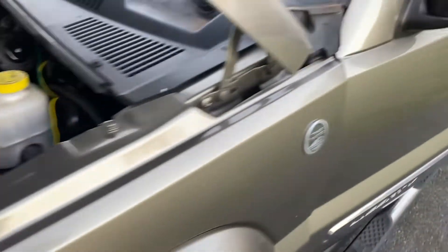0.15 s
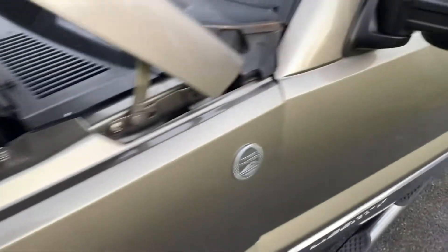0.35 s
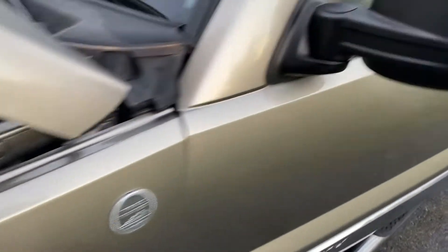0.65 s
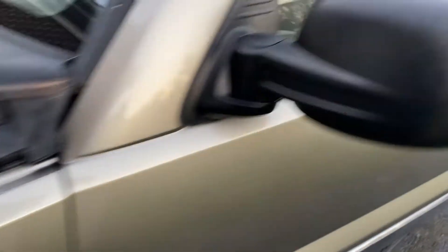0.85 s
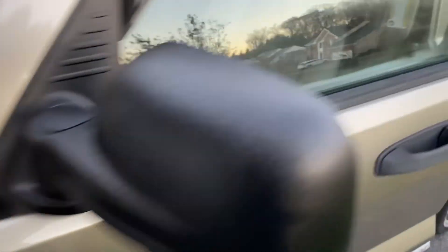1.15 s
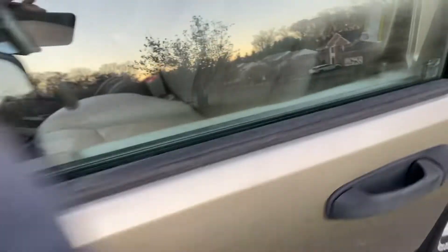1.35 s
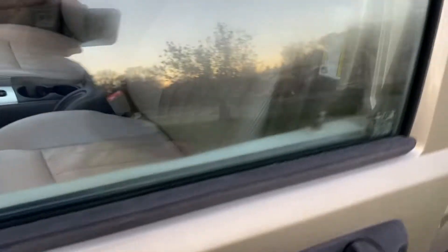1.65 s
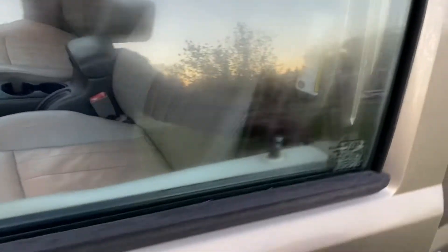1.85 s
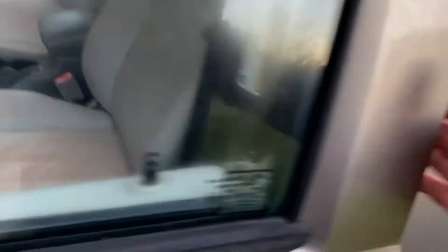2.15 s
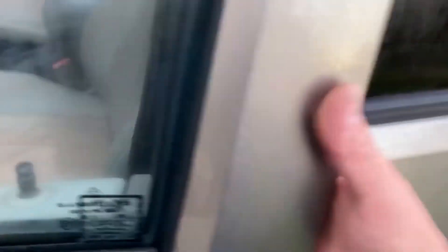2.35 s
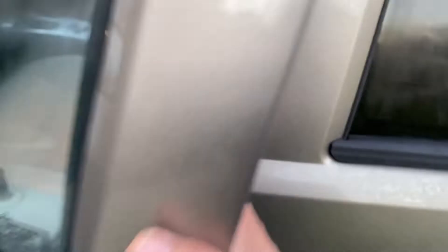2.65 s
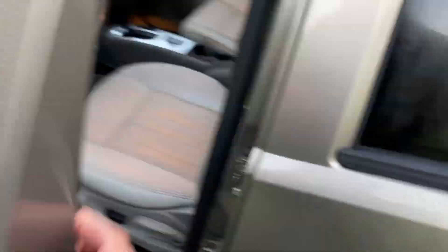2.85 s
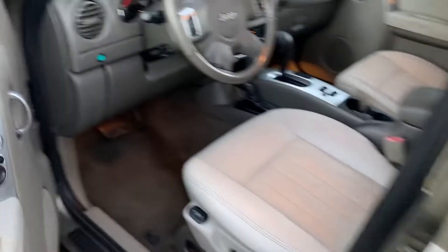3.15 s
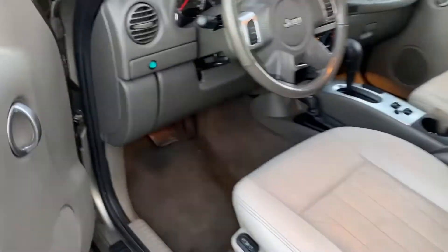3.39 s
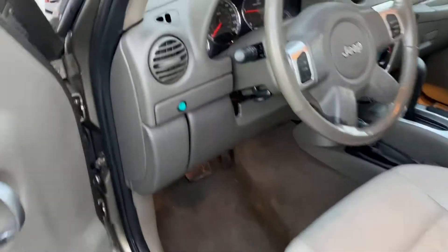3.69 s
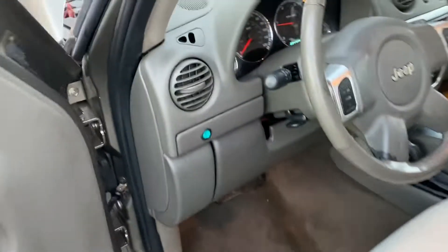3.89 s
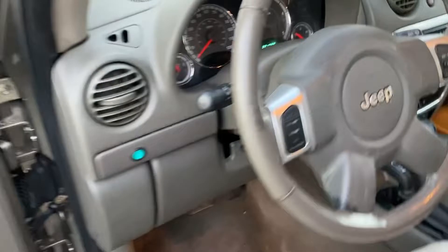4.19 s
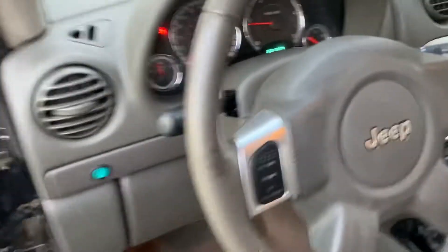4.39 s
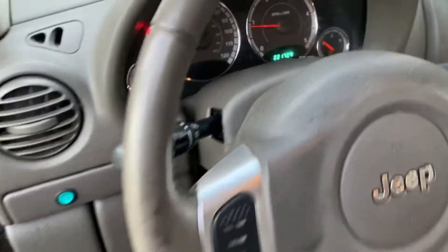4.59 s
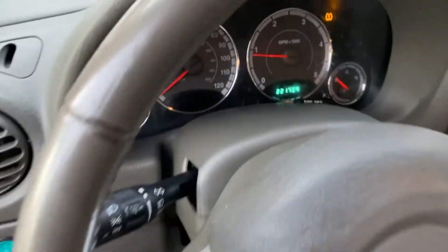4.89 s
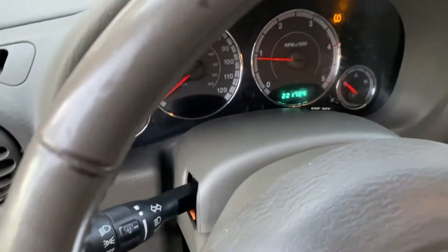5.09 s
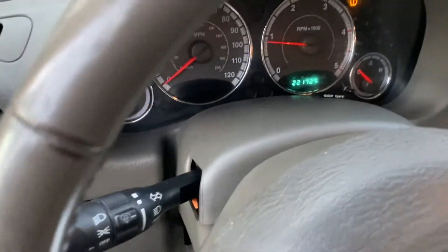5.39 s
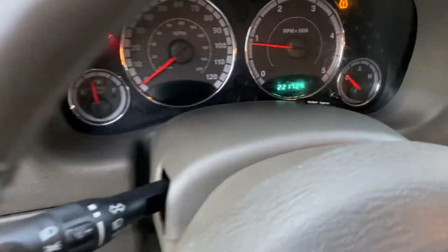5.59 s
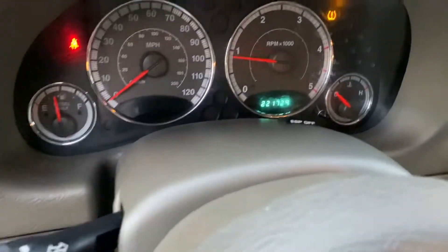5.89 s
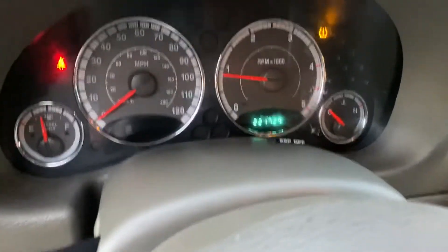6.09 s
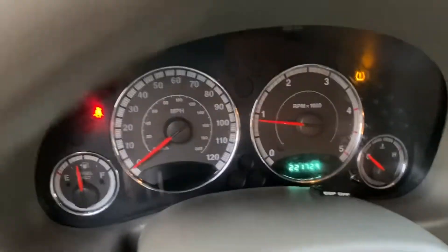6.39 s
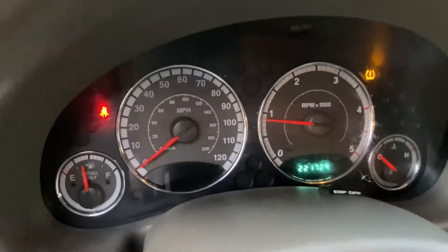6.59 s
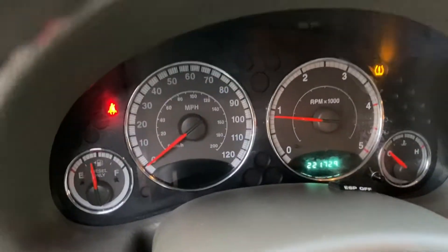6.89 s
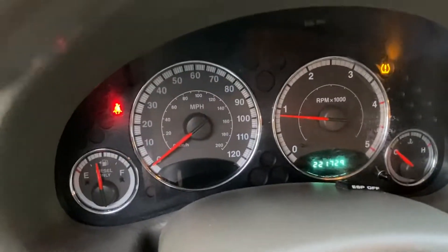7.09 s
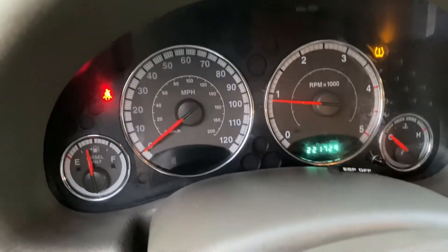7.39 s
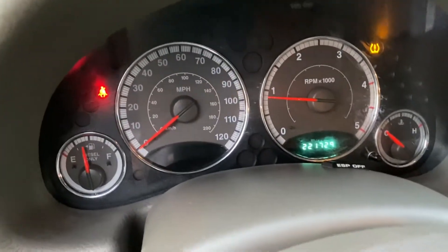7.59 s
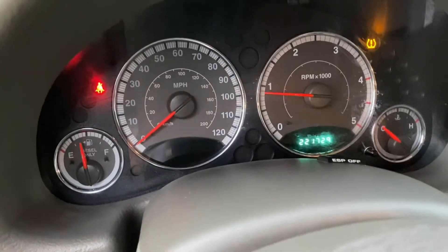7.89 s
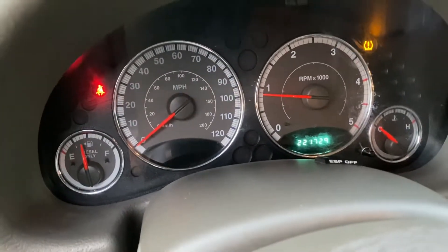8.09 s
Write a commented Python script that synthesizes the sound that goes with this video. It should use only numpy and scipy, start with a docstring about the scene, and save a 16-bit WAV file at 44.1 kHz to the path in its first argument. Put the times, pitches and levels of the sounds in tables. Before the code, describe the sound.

Steady rattly turbodiesel idle outdoors, bright metallic ticking at first, then boomy beside the door, fading to a dull, hollow murmur in the car.

```python
"""Cold diesel idle, from bonnet to driver's seat

A cold four-cylinder turbodiesel idles outdoors, heard on a walk from the open bonnet into the cabin.
Boom: sines at multiples of the firing rate. Thrum, rattle: filtered impulses at fixed crank angles.
Clatter, a hard-knocking cylinder, injectors, pipes and taps: grains gated by firing, through resonances.
Single knocks and ticks, pipe pings and a faint air hiss are added; most layers grow fainter inside."""
import sys
import numpy as np
from scipy import signal
from scipy.fft import rfft, irfft, next_fast_len
from scipy.io import wavfile

SR = 44100
rng = np.random.default_rng(int(sys.argv[2]) if len(sys.argv) > 2 else 0)


def bounce(signal):
    """Save signal as a 16-bit WAV file at the path given by the first command-line argument."""
    frames = np.transpose(np.atleast_2d(signal))
    limited = np.clip(frames, -1, 1)
    pcm = np.round(limited * 32767).astype(np.int16)
    wavfile.write(sys.argv[1], SR, pcm)


N = 363825
TIME = np.arange(N) / SR
SIZE = next_fast_len(N + SR // 4)
HZ = np.maximum(np.arange(SIZE // 2 + 1) * SR / SIZE, 1)
SIDES = np.array([[1], [-1]])   # left, right
CYLINDERS = 4   # firings per engine cycle

DOOR_OPEN_S, SILL_S = 3.02, 4.66   # middle of the door's swing, crossing the sill
# cabin resonances: (centre [Hz], width [Hz], lift [dB])
CABIN_MODES = [(650, 30, 4), (1330, 54, -4), (1416, 28, 11.5), (1610, 35, 2.5), (1710, 90, -4),
               (1820, 40, 4.5), (1980, 110, -2.5), (2490, 76, 4.5), (3000, 84, 4)]


def from_db(db):
    """Decibels to gain."""
    return 10 ** (np.asarray(db) / 20)


def rms_one(x):
    """Scale to unit rms."""
    return x / np.sqrt(np.mean(x ** 2) + 1e-20)


def in_time(rows):
    """Each column of a curve at every sample; end values hold."""
    s, *columns = np.transpose(rows)
    return [np.interp(TIME, s, column) for column in columns]


def over_hz(points):
    """A table over frequency, joined on a log axis."""
    hz, value = np.transpose(points)
    return np.interp(np.log(HZ), np.log(hz), value)


def ramp(start_s, end_s):
    """Linear passage from 0 to 1."""
    return np.clip((TIME - start_s) / (end_s - start_s), 0, 1)


def passing(s, half_s):
    """Gaussian rise to 1 and back around one moment."""
    return np.exp(-((TIME - s) / half_s) ** 2)


def drift(rate_hz):
    """Slow random curve: normal values at rate_hz, joined by lines."""
    return np.interp(TIME * rate_hz, np.arange(2000), rng.standard_normal(2000))


def band(x, hz, width_hz):
    """One resonance, gain 1 at its top."""
    return signal.lfilter(*signal.iirpeak(hz, hz / width_hz, fs=SR), x)


def colour(x, spectrum):
    """Filter by a smooth gain curve in dB; rms 1."""
    return rms_one(irfft(rfft(x, SIZE) * from_db(over_hz(spectrum)), SIZE)[..., :N])


def resonate(x, modes):
    """Modes in series, each lifting or cutting a narrow band; rms 1."""
    for hz, width_hz, lift_db in modes:
        x = x + (from_db(lift_db) - 1) * band(x, hz, width_hz)
    return rms_one(x)


def sliding(x, curve):
    """A resonance whose pitch and lift follow a curve, pitch stepped block by block."""
    hz, lift_db = in_time(curve)
    q = 8.6
    out, state, size = np.zeros_like(x), np.zeros((2, 2)), 512
    for i in range(0, N, size):
        block = x[:, i:i + size]
        out[:, i:i + size], state = signal.lfilter(*signal.iirpeak(hz[i], q, fs=SR), block, zi=state)
    return x + (from_db(lift_db) - 1) * out


def blend(outside, cabin, inside):
    """Equal-power passage from the open air into the cabin."""
    inside = np.clip(inside, 0, 1)
    return np.sqrt(1 - inside) * outside + np.sqrt(inside) * cabin


def grains(spread_db, per_s=SR / 3):
    """Two unrelated streams of tiny impacts of uneven size; rms 1."""
    born = rng.random((2, N)) < per_s / SR
    sign = rng.choice([-1, 1], (2, N))
    return rms_one(born * sign * from_db(spread_db * rng.standard_normal((2, N))))


def bursts(turn, start, rise, decay, uneven_db, count):
    """A swell and decay once every count firings, each of its own strength (times in firings); rms 1."""
    number, age = np.divmod(turn - start + CYLINDERS, count)
    strength = from_db(uneven_db * rng.standard_normal(1000))[number.astype(int)]
    return rms_one(strength * (1 - np.exp(-age / rise)) * np.exp(-age / decay))


def contacts(turn, jitter_s, uneven, count):
    """Valves, pistons and gears touch at the same crank angles every cycle, a little off in time and force."""
    out = np.zeros((2, N))
    cycles = np.arange(turn[-1] // CYLINDERS + 1)[:, None]
    for stream in out:
        angles = CYLINDERS * (cycles + (np.arange(count) + rng.random(count)) / count)
        # the path from each contact to the listener changes slowly along the walk
        path = np.cos(2 * np.pi * rng.random(count) + 0.2185 * cycles * rng.standard_normal(count))
        force = path * (1 + uneven * rng.standard_normal(angles.shape))
        s = np.interp(angles, turn, TIME, right=-1) + jitter_s * rng.standard_normal(angles.shape)
        heard = (s > 0) & (s < TIME[-1])
        stream[(s[heard] * SR).astype(int)] = force[heard]
    return out


def restrike(x, turn, low_hz, high_hz, count):
    """Each firing draws new lifts for a row of resonances, so each stroke has its own colour; rms 1."""
    colour_db, q = 4.5, 14
    stroke = (turn + .5).astype(int)
    for hz in np.geomspace(low_hz, high_hz, count):
        lift_db = colour_db * rng.uniform(-1, 1, 1000)[stroke]
        x = x + (from_db(lift_db) - 1) * band(x, hz, hz / q)
    return rms_one(x)


def listener():
    """The walk as shares 0-1: way along the wing, engine hidden, door open, depth in the cabin."""
    leave_s, arrive_s = 0.26, 2.6
    shaded_after_s, half_swing_s = 1.49, 0.11
    # leaning in, first value held before: (time [s], depth [1 at the dashboard])
    depth_curve = [(4.15, 0.21), (4.6, 0.36), (5.5, 0.44), (6.4, 0.55), (7.3, 0.78), (8.25, 1)]
    along = ramp(leave_s, arrive_s)
    shaded = ramp(leave_s, leave_s + shaded_after_s)
    opened = ramp(DOOR_OPEN_S - half_swing_s, DOOR_OPEN_S + half_swing_s)
    return along, shaded, opened, in_time(depth_curve)[0]


def strong_orders(along, opened, depth, lag):
    """(multiple, dB over time) of the booming orders: the lower ones follow the walk and dip at nodes."""
    # lower orders: (multiple of firing rate, base level [dB], loss at door [dB],
    # loss as door opens [dB], loss at dashboard [dB])
    low_orders = [(2, -24.5, 7, 6, 12.4), (2.25, -41, -1, 9, 15), (2.5, -42, -1, 9, 15),
                  (3, -31, -2.5, 5.8, 23.5), (4, -34, 5, 17, 6.8)]
    # quiet spots of standing waves passed: (time [s], half duration [s], multiple that fades, loss [dB])
    nodes = [(.1, 0.52, 3, 21), (1.979, 0.41, 4, 17), (3.15, 0.68, 2, 6), (6.9, 0.29, 4, 21),
             (7.0, .3, 2, 3), (7.48, .1, 3, 6.5)]
    # order five: (time [s], level [dB])
    main_boom = [(0.08, -23.5), (0.55, -26), (0.96, -33.5), (1.62, -23), (2.48, -22), (2.84, -24.5),
                 (3.49, -21), (4.13, -22), (4.83, -32.5), (5.06, -32.5), (5.62, -39), (5.75, -34.5),
                 (6.07, -37.5), (6.35, -35.5), (6.78, -44), (7.25, -44), (7.7, -46), (8.2, -47.5)]
    orders = []
    for k, db, door_db, open_db, cabin_db in low_orders:
        dips_db = sum(lost_db * passing(s, half_s) for s, half_s, which, lost_db in nodes
                      if round(which * CYLINDERS) == round(k * CYLINDERS))
        level_db = db - door_db * along - open_db * opened - cabin_db * depth ** lag - dips_db
        orders.append((k, level_db))
    return orders + [(5, in_time(main_boom)[0])]


def boom(turn, thrum_db, orders, depth):
    """Sines at multiples of the firing rate; whole multiples crest together once per firing."""
    # weak orders: (multiple of firing rate, level against the thrum [dB])
    weak_orders = [(1, -27), (5.75, -17), (6, -9.5), (7, -15), (7.5, -9.5), (8, -14), (8.5, -11), (9, -14),
                   (12, -13), (13, -18)]
    weak_lost_db = 8   # the cabin rounds off the pulse
    crest_at = 0.273   # firings after the start of each stroke
    pan_db = -1.5   # left minus right at full depth
    right_lead_rad = 0.084 * depth + passing(s=7.1, half_s=0.38)
    weak = [(k, thrum_db + db - weak_lost_db * depth) for k, db in weak_orders]
    out = 0
    for k, db in orders + weak:
        k = np.round(k * CYLINDERS) / CYLINDERS   # whole waves per engine cycle
        crest = crest_at + CYLINDERS * rng.random() * (k % 1 > 0)
        phase = 2 * np.pi * k * (turn - crest) + 0.32 * drift(15)
        out = out + np.sqrt(2) * from_db(db + 0.7 * drift(9)) * np.exp(1j * phase)
    pair = np.real(out * np.exp(-.5j * right_lead_rad * SIDES))
    return pair * from_db(SIDES * pan_db * depth ** 2 / 2)


def thrum(turn):
    """The low voice of block and panels: crank-angle contacts swelling at each firing."""
    # (frequency [Hz], gain [dB])
    spectrum = [(30, -16), (42, -6), (65, -0.5), (120, -3.5), (165, 0), (225, -1), (290, -1.5), (340, -1.5),
                (430, -7), (560, -24.5), (800, -61)]
    shake = 0.5 + 0.46 * bursts(turn, start=0.903, rise=0.23, decay=0.42, uneven_db=2.0, count=1)
    return colour(contacts(turn, jitter_s=0.00021, uneven=0.42, count=112) * shake, spectrum)


def rattle(turn, inside):
    """Covers and brackets rattle under the same kind of contacts, in a burst after each firing."""
    # outside and in the cabin: (frequency [Hz], gain [dB])
    open_spectrum = [(300, -24.5), (450, 1), (530, -1.5), (600, 2.5), (680, -2.5), (760, 0), (900, -4),
                     (1050, -5.5), (1250, -4), (1600, -19), (2400, -40.5)]
    cabin_spectrum = [(300, -10.5), (460, -10.5), (640, 2), (750, -9), (870, -4), (1030, -4.5),
                      (1220, -7.5), (1600, -14.5), (2400, -47)]
    shake = 2.0 + 0.81 * bursts(turn, start=0.82, rise=0.21, decay=0.3, uneven_db=1.5, count=1)
    drive = contacts(turn, jitter_s=.00015, uneven=0.29, count=170) * shake
    cabin = resonate(colour(drive, cabin_spectrum), CABIN_MODES)
    return blend(colour(drive, open_spectrum), cabin, inside)


def block_ring(turn):
    """The hard cylinder, and more weakly the one before it, rings the lowest block mode."""
    force = bursts(turn, start=2.63, rise=0.16, decay=0.22, uneven_db=0.5, count=4)
    before = bursts(turn, start=1.68, rise=.1, decay=0.27, uneven_db=2.0, count=4)
    drive = grains(spread_db=0.5) * (force + from_db(-1.5) * before)
    return rms_one(band(band(drive, hz=1014, width_hz=69), hz=1000, width_hz=380))


def hard_knock(turn):
    """The hard cylinder's combustion: a body, a sharp crack at its start and a second slap."""
    # (frequency [Hz], gain [dB])
    knock_spectrum = [(600, -23), (950, 9), (1300, 4.5), (1700, 0.5), (2300, -4), (3000, -3), (3500, -12),
                      (4700, -7), (7000, -19), (16000, -48)]
    crack_db, slap_db = -4, -9.5   # against the body
    body = bursts(turn, start=2.57, rise=0.34, decay=0.48, uneven_db=1.5, count=4)
    crack = bursts(turn, start=2.62, rise=0.044, decay=0.11, uneven_db=1.4, count=4)
    slap = bursts(turn, start=2.95, rise=0.032, decay=0.092, uneven_db=0.5, count=4)
    force = body + from_db(crack_db) * crack + from_db(slap_db) * slap
    return colour(grains(spread_db=1.0) * force, knock_spectrum)


def knock_ring(turn):
    """A short metallic sine in each hard knock, strongest in the space behind the steering wheel."""
    ring_hz, ring_db, wheel_db = 3026, -13.5, 10.5
    swell = bursts(turn, start=2.62, rise=.3, decay=0.17, uneven_db=1.0, count=4)
    note = np.sin(2 * np.pi * ring_hz * TIME + [drift(60), drift(60)])
    return from_db(ring_db + wheel_db * passing(s=6.24, half_s=0.39)) * swell * note


def clatter(turn, shaded, inside):
    """Combustion rings the block at each firing; one cylinder knocks harder than the rest."""
    # (frequency [Hz], gain [dB])
    spectrum = [(600, -39), (950, -6), (1300, -2), (1700, 0.5), (2300, -0.5), (3000, -6), (3500, -9),
                (4700, -6), (7000, -16), (16000, -52)]
    # block resonances: (centre [Hz], width [Hz], lift [dB])
    block_modes = [(1009, 32, 5.5), (1430, 52, 4.5), (1564, 38, 5.5), (2020, 40, 4), (2243, 33, 1.5),
                   (2750, 110, -4), (2870, 93, 6)]
    # knocks harder or softer than usual: (time [s], lift [dB])
    odd_knocks = [(.4, 2.5), (.99, -5.5), (1.28, 1.5), (1.72, 4.5), (2.02, 2.5), (2.17, -1), (2.46, 1.5),
                  (2.61, -5.5), (2.756, 0), (3.05, -7), (3.345, 1.5), (3.79, 3.5), (4.08, 1), (4.23, 1),
                  (4.67, -12), (5.12, 3), (5.41, 4), (5.86, -3), (6.15, 1.5), (6.3, 1.5), (6.6, -8),
                  (7.19, -3.5), (7.48, 0), (7.63, 3.5), (7.78, -3)]
    knock_db = -5 + 1.5 * shaded - 0.5 * inside   # against the steady clatter
    knock_db = knock_db + sum(db * passing(s, half_s=0.062) for s, db in odd_knocks)
    firing = bursts(turn, start=0.61, rise=0.19, decay=0.37, uneven_db=2.0, count=1)
    steady = colour(grains(spread_db=2.0) * np.sqrt(1 + from_db(0.5) * firing ** 2), spectrum)
    impacts = steady + from_db(knock_db) * hard_knock(turn)
    strokes = restrike(impacts, turn, low_hz=950, high_hz=3410, count=10)
    block = resonate(strokes + from_db(knock_db) * knock_ring(turn), block_modes)
    return blend(block, resonate(block, CABIN_MODES), inside)


def injectors(turn, shaded, inside):
    """A bright spray of ticks at every firing, earlier and grittier over the open engine bay."""
    # (frequency [Hz], gain [dB])
    spectrum = [(1200, -29), (2500, 3), (3700, 4.5), (4200, -2.5), (4900, -1), (6000, -7), (6900, -7.5),
                (8000, -1), (9500, 0), (12000, -7), (16000, -20)]
    # injector resonances: (centre [Hz], width [Hz], lift [dB])
    modes = [(4800, 230, 1.9), (5320, 67, 3.7), (6170, 120, 4), (6860, 174, 12.6)]
    lead_firings, grit_db, grit_per_s = 0.095, -4, 1300   # at the bonnet
    early = turn + lead_firings * (1 - shaded)
    spray = bursts(early, start=0.4, rise=0.23, decay=0.37, uneven_db=1.5, count=1)
    grit = from_db(grit_db) * (1 - shaded) * grains(spread_db=0.5, per_s=grit_per_s)
    ticks = colour((grains(spread_db=2.0) + grit) * np.sqrt(from_db(-9.5) + spray ** 2), spectrum)
    ticks = restrike(ticks, turn, low_hz=2400, high_hz=7080, count=9)
    return resonate(ticks, modes) * from_db(1.0 - 0.76 * inside)


def pipes(turn, pipe_db):
    """Each injection sets three fuel-pipe modes ringing, two of them close in pitch."""
    # (centre [Hz], width [Hz], level [dB])
    modes = [(3660, 30, -1), (3760, 47, -0.5), (5420, 42, -10)]
    force = from_db(pipe_db) * bursts(turn, start=0.44, rise=0.18, decay=0.5, uneven_db=3.0, count=1)
    drive = grains(spread_db=3.0)
    scale = np.std(band(drive, *modes[0][:2]))   # first mode under steady drive
    return sum(from_db(db) * band(drive * force, hz, width_hz) for hz, width_hz, db in modes) / scale


def taps(turn):
    """A hard metallic tick just before each firing: gated grains in one resonance, soon faded out."""
    start_db, fade_db_per_s, hz = -39.5, -32, 2245
    force = bursts(turn, start=0.24, rise=0.059, decay=0.16, uneven_db=3.0, count=1)
    narrow = band(grains(spread_db=1.0) * force, hz, width_hz=220)
    ring = rms_one(band(narrow, hz, width_hz=1400))
    return from_db(start_db + fade_db_per_s * TIME) * ring


def air_hiss():
    """Faint hiss of the air: filtered noise."""
    # (frequency [Hz], gain [dB])
    spectrum = [(30, 14.5), (200, 11), (1000, -12), (4000, -10.5), (10000, -3), (16000, -16)]
    return from_db(-59.5) * colour(rng.standard_normal((2, N)), spectrum)


def single_knocks():
    """A few knocks and ticks: resonant noise with a sudden start and exponential decay."""
    # two hard engine knocks with small ticks beside them, a soft release, a last tick:
    # (time [s], starting level [dB], centre [Hz], width [Hz])
    knock_rows = [(0.246, -29.5, 1380, 1100), (0.272, -37.5, 5470, 6000), (0.392, -33, 1550, 700),
                  (0.423, -36.5, 3700, 1400), (2.756, -25, 1100, 400), (2.758, -35.5, 2400, 2400),
                  (2.811, -41, 2350, 705), (2.819, -42.5, 4000, 6000), (3.722, -48, 4000, 6000)]
    decay_s = 0.009
    noise = rng.standard_normal((2, N))
    out = 0
    for s, db, hz, width_hz in knock_rows:
        blow = from_db(db) * (TIME >= s) * np.exp(-np.abs(TIME - s) / decay_s)
        out = out + blow * rms_one(band(band(noise, hz, width_hz), hz, width_hz))
    return out


def pings():
    """Now and then, and in short runs, a fuel pipe rings out: a decaying sine."""
    # (time [s], level before the swell [dB], pitch [Hz])
    ping_rows = [(0.4207, -40, 3760), (1.4227, -44, 3760), (1.8272, -39, 3760), (3.2251, -43, 3760),
                 (4.1061, -39, 3610), (4.48, -37.5, 3760), (4.594, -45, 3680), (5.1442, -46, 3650),
                 (5.2554, -46, 3670), (5.3617, -49, 3650), (5.5124, -45, 3640), (5.5862, -48, 3700),
                 (5.697, -45, 3770), (5.7683, -44, 3650), (5.8815, -44, 3650), (6.0377, -43, 3750),
                 (6.3709, -54, 3750), (6.5514, -50, 3780), (6.6664, -47, 3770), (6.776, -47, 3760),
                 (6.8124, -48, 3770), (7.0638, -54, 3700), (7.1013, -49, 3750), (7.1432, -48, 3760),
                 (7.2174, -50, 3760), (7.2484, -48, 3760), (7.2864, -51, 3660), (7.5443, -50, 3760),
                 (7.5857, -48, 3770), (7.9882, -53, 3660)]
    rise_s, decay_s = 0.0032, .018
    out, age = np.zeros((2, N + SR)), TIME[:SR // 8]
    swell = (1 - np.exp(-age / rise_s)) * np.exp(-age / decay_s)
    for s, db, hz in ping_rows:
        start = int(s * SR)
        tone = np.sin(2 * np.pi * (hz * age + rng.random()))
        out[0, start:start + len(age)] += from_db(db) * swell * tone   # stream 0 feeds both sides alike
    return out[:, :N]


def surroundings(field, along, shaded, opened, depth, inside):
    """Each place on the walk adds its resonances while near; four more slide with the walk and door."""
    # fixed colours of places: (centre [Hz], width [Hz], lift [dB])
    bonnet_echo = [(2300, 400, 3.5), (263, 90, 4.5), (480, 60, 4.5), (4940, 2300, 2.5), (12000, 5000, 2)]
    wing_echo = [(700, 91, -0.5), (1030, 370, 3)]
    door_echo = [(780, 270, 4), (560, 48, -3), (220, 50, 4)]
    doorway_echo = [(810, 270, -1), (343, 61, -3), (490, 56, 3.5), (14000, 4000, 5)]
    sill_echo = [(463, 60, -2), (576, 130, 4.5), (1080, 150, 2)]
    dashboard_echo = [(363, 140, -5), (470, 100, -2.5), (660, 36, 6), (850, 97, 5), (1210, 190, -7.5),
                      (4300, 700, -4)]
    # sliding resonances: (time [s], centre [Hz], lift [dB])
    wing_resonance = [(0, 620, -1), (.25, 610, 2), (.8, 579, 5.5), (1.25, 570, 7.5), (1.5, 565, 1.5)]
    gap_resonance = [(1.6, 403, 1.9), (2.298, 367, 4), (2.9, 335, 5.5), (3.3, 280, 5.3), (3.6, 224, 7.2),
                     (4.2, 214, 2.4), (4.8, 304, 6.3), (5.6, 295, 0.5)]
    door_resonance = [(2.4, 950, 0.5), (2.8, 1000, 3), (3.2, 1030, 6), (3.6, 1200, 6.5), (3.95, 1090, 6),
                      (4.3, 1030, 5), (5.2, 1030, -1)]
    door_notch = [(1.5, 543, 2), (2.2, 533, 2), (3.1, 544, -7), (3.45, 434, -7), (3.85, 380, -16),
                  (4.15, 376, 1.5)]
    places = [(bonnet_echo, (1 - shaded) ** 3), (wing_echo, passing(s=0.69, half_s=0.62)),
              (door_echo, along ** 2 * (1 - opened)), (doorway_echo, opened * (1 - inside)),
              (sill_echo, passing(SILL_S, half_s=0.64)), (dashboard_echo, depth ** 2)]
    for echo, near in places:
        for hz, width_hz, lift_db in echo:
            field = field + (from_db(lift_db * near) - 1) * band(field, hz, width_hz)
    for curve in (wing_resonance, gap_resonance, door_resonance, door_notch):
        field = sliding(field, curve)
    return field


def ports(field, bass):
    """Two unrelated streams become left and right, partly alike; the bass joins as its own pair."""
    # (frequency [Hz], likeness of the sides [0-1, clipped])
    likeness = [(60, 1.1), (400, 0.9), (800, 0.84), (1200, 0.5), (1650, 0.3), (2400, 0.76), (4500, 0.73),
                (5700, 0.5), (6500, 1.06)]
    # (frequency [Hz], phase by which left leads [rad])
    lead = [(60, -0.097), (150, -.3), (400, 0.46), (650, 0.92), (1400, 2.2), (1900, 0.2), (3100, 1.1),
            (4200, -0.03), (6400, 0)]
    # (frequency [Hz], left minus right [dB])
    balance = [(300, .2), (580, -1.6), (900, 2), (1400, 1.2), (1800, 2.6), (5500, 2.8), (6500, 0)]
    shared, apart = rfft(field, SIZE)
    alike = np.clip(over_hz(likeness), 0, 1)
    pair = np.sqrt((1 + alike) / 2) * shared + SIDES * np.sqrt((1 - alike) / 2) * apart
    pair = pair + rfft(bass, SIZE)
    pair = pair * from_db(SIDES * over_hz(balance) / 2) * np.exp(.5j * SIDES * over_hz(lead))
    return irfft(pair, SIZE)[:, :N]


def scene():
    """One crankshaft drives every engine layer; one walk shapes their levels."""
    # engine speed: (time [s], firing rate [1/s])
    firing_rate = [(0.0, 27.148), (1.1, 27.262), (1.6, 27.139), (3.0, 27.124), (3.6, 27.094), (5.0, 27.064),
                   (6.5, 27.07), (8.25, 27.039)]
    # layer levels: (base [dB], loss behind wing [dB], gain as door opens [dB], loss at dashboard [dB])
    thrum_levels = (-32.3, 0.7, 0.3, 20)
    rattle_levels = (-32.4, 6, -1.5, 11.5)
    clatter_levels = (-37.7, 4.0, -1.8, 15.5)
    injector_levels = (-40.2, 8.7, 0.7, 14)
    thrum_lag, treble_lag = 1.064, 0.75   # powers of depth: bass is lost later, ticks sooner
    hollow_at_depth = 0.35   # how soon the cabin's ring takes over

    turn = np.cumsum(in_time(firing_rate)[0]) / SR   # firings so far
    along, shaded, opened, depth = listener()
    inside = np.tanh(depth / hollow_at_depth) * ramp(DOOR_OPEN_S, SILL_S) ** 2

    def level(levels, lag):
        """Layer level in dB over the walk."""
        db, wing_db, open_db, cabin_db = levels
        return db - wing_db * shaded + open_db * opened - cabin_db * depth ** lag

    thrum_db = level(thrum_levels, thrum_lag)
    injector_db = level(injector_levels, treble_lag)
    rattling = rattle(turn, inside) + from_db(-6.5 - 4 * inside) * block_ring(turn)
    field = from_db(thrum_db) * thrum(turn)
    field = field + from_db(level(rattle_levels, 1)) * rattling
    field = field + from_db(level(clatter_levels, 1)) * clatter(turn, shaded, inside)
    field = field + from_db(injector_db) * injectors(turn, shaded, inside)
    field = field + pipes(turn, injector_db - 9.5 + 1.5 * inside) + taps(turn) + pings()
    field = surroundings(field, along, shaded, opened, depth, inside)
    bass = boom(turn, thrum_db, strong_orders(along, opened, depth, thrum_lag), depth)
    return ports(field + air_hiss() + single_knocks(), bass)


def record(dry):
    """Widen the treble by turning the right channel's phase in half-turn steps, then cut the top."""
    cutoff_hz = 15900
    start_hz, step_hz, slope_hz = 7550, 2050, 900
    step, within_hz = np.divmod(np.maximum(HZ - start_hz, 0), step_hz)
    half_turns = step + np.minimum(within_hz / slope_hz, 1)
    right = irfft(rfft(dry[1], SIZE) * np.exp(1j * np.pi * half_turns), SIZE)[:N]
    low_pass = signal.ellip(12, .1, 80, cutoff_hz, fs=SR, output="sos")
    return signal.sosfilt(low_pass, [dry[0], right])


dry = scene()
out = record(dry)
bounce(out)
```